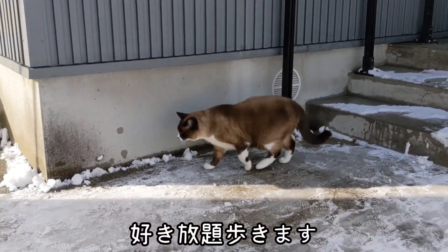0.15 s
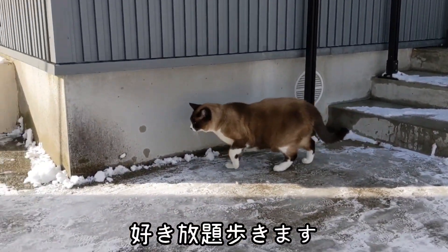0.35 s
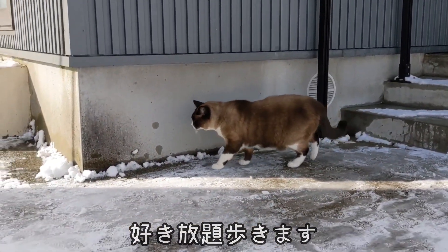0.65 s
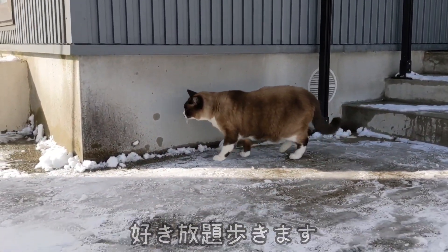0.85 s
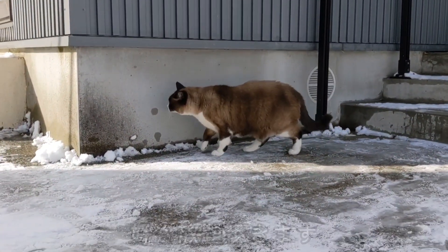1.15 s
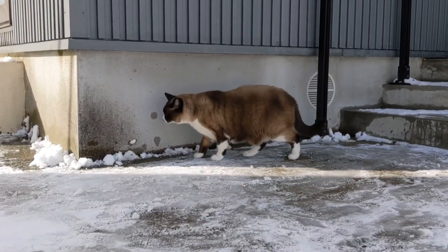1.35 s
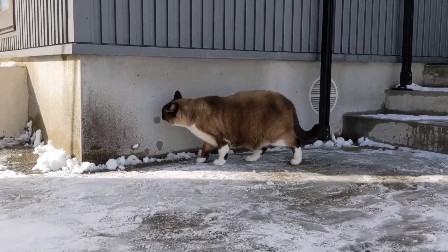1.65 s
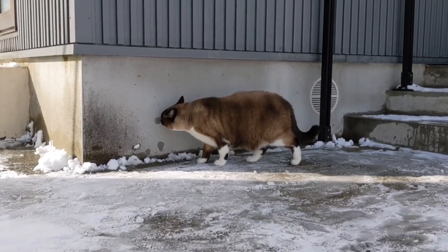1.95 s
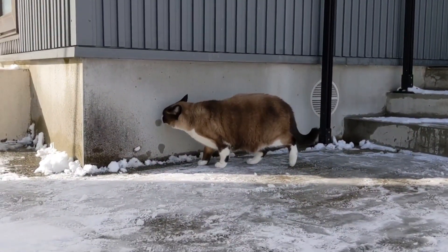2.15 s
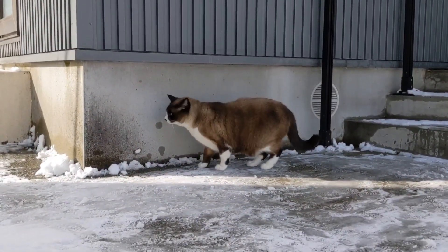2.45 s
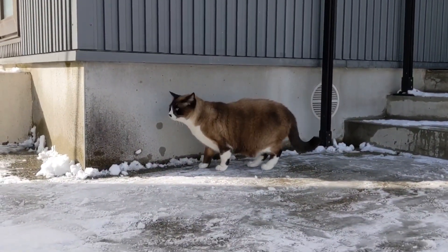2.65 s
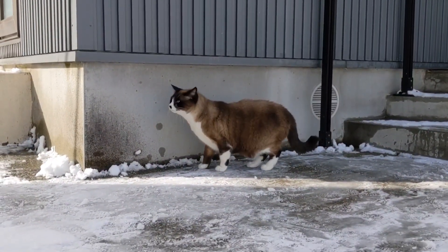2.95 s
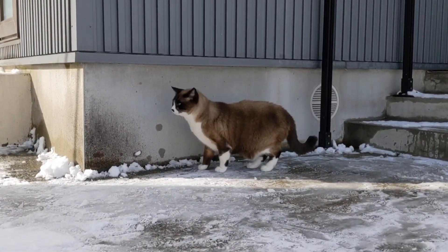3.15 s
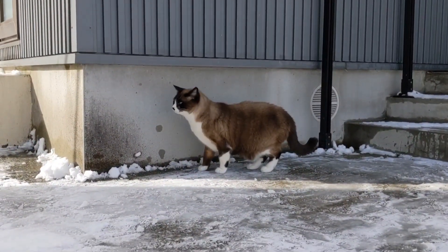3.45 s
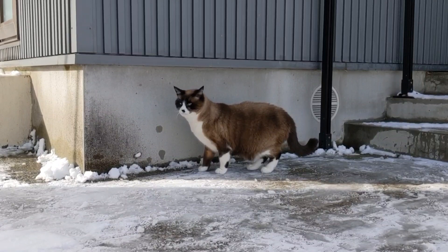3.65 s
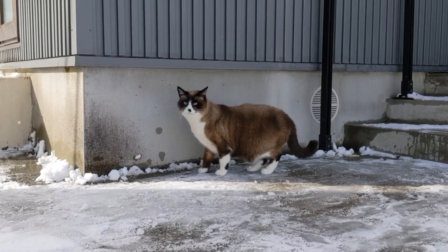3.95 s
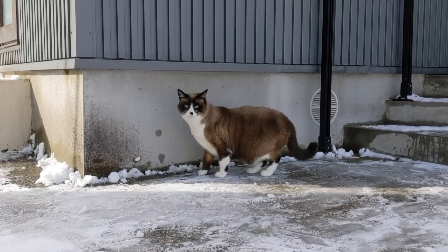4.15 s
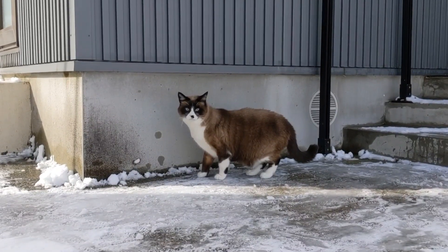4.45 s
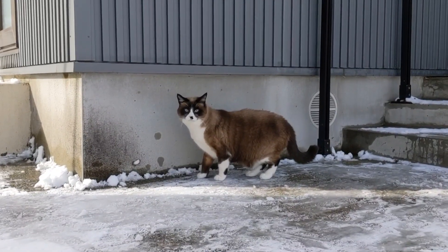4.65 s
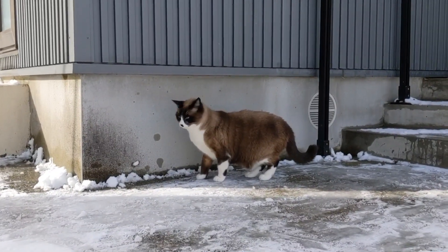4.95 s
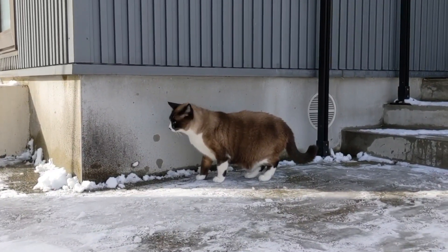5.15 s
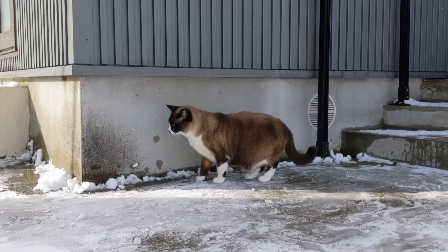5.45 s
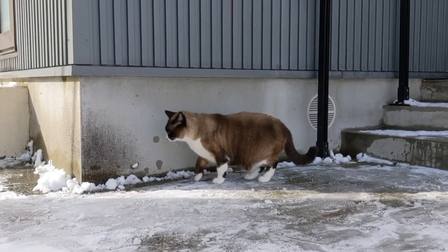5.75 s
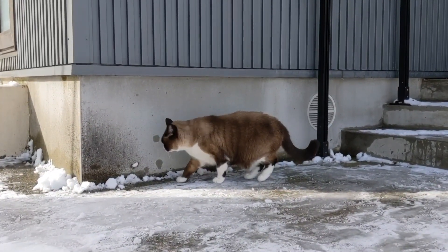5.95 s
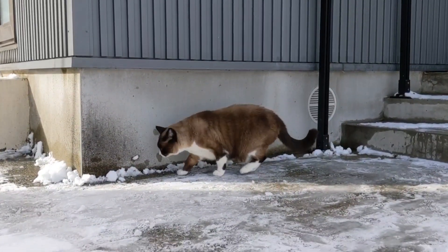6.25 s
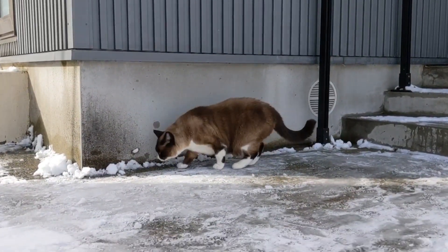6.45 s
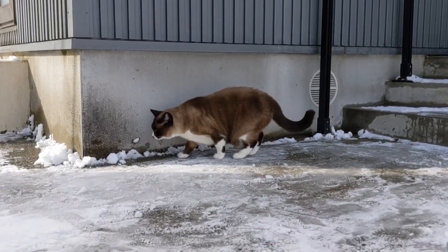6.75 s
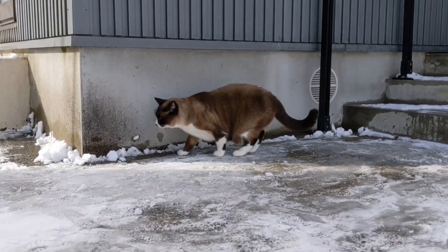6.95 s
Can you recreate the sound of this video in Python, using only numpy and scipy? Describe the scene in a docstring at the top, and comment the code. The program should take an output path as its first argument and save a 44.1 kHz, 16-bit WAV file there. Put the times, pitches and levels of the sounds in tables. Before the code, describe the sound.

A quiet yard beside a house, heard through an exposed stereo microphone with slight hiss. From 0.2 to 0.7 seconds, soft low wind puffs thump and rumble, with smaller ones near 1.3 and 1.8. A very faint dry rustle of snow, fizzy with a little scrape, swells around 0.3 and 1.6 seconds with tiny scuffs, then fades after 2. Small sharp drips tick on ice irregularly throughout, some bright, some duller, clearest around 1.9 and between 2.6 and 3.2, each echoing briefly off the wall. Distant neighbourhood noise stays low, with a barely audible wavering moan. Wind is mostly calm from 2 to 3.5 seconds, then builds at 4.1; heavy fluttering buffets cluster from 4.6 to 5.3. Uneven puffs continue, with one faint scuff near 5.65, and the strongest low burst arrives at 7 seconds as it ends.

```python
"""Puffs of wind buffet two microphone ports beside a house: low turbulence whose level and pitch ride the
airflow. Small sharp ticks, likely meltwater dripping on ice, are short coloured clicks that echo off the wall.
A soft rustle of snow, swells of filtered noise, fades after two seconds; a few quiet scuffs go with it, and
later a soft burst of noise trails a drip. Behind lies a quiet neighbourhood of coloured noise with a faint,
wavering, far-off moan."""
import sys
import numpy as np
from scipy import signal
from scipy.fft import rfft, irfft
from scipy.io import wavfile
from scipy.ndimage import uniform_filter1d, map_coordinates

SR = 44100
rng = np.random.default_rng(int(sys.argv[2]) if len(sys.argv) > 2 else 0)


def store_wav(level_fs):
    """Save 16-bit WAV to argv[1]."""
    pcm = np.round(np.clip(np.atleast_2d(level_fs), -1, 1) * 32767)
    wavfile.write(sys.argv[1], SR, pcm.T.astype(np.int16))


N = 312404
T = np.arange(N) / SR  # time [s]
HZ = np.fft.rfftfreq(N, 1 / SR)  # frequency of each spectral bin

# neighbourhood noise, its spectrum: (frequency [Hz], relative density [dB])
AIR_COLOUR = [(25, -20.5), (60, -1.5), (170, 5), (280, -4.5), (500, -10.5), (720, -10.5), (1000, -16),
              (2000, -19), (4000, -25.5), (8000, -31.5), (16000, -37)]
# neighbourhood noise, its middle level: (time [s], level [dB])
AIR_LEVEL = [(0, -52), (1.6, -53), (2.7, -54.5), (7.08, -56.5)]
# how alike the neighbourhood is left and right: (frequency [Hz], correlation [0 to 1])
AIR_LIKENESS = [(40, 1), (150, 1), (380, 0.89), (700, 0.58), (1300, 0.055), (16000, 0.013)]
# swells of a faint far moan: (time [s], level [dB], length [s], pitch [Hz])
MOAN_SWELLS = [(1.201, -61.5, 0.26, 348), (1.621, -57.5, 0.16, 372), (2.252, -64, .2, 337),
               (3.551, -58, .12, 385), (3.721, -63, 0.1197, 410), (3.9, -61.5, 0.12, 350)]
MOAN_HZ, MOAN_DB, WAVER_HZ = 361.3, -69, 32  # the moan between swells, and how fast it wavers

# swells of rustling snow: (time [s], fine fizz level [dB], length [s], coarser scrape level [dB])
RUSTLE_SWELLS = [(0.333, -59.5, 0.89, -62), (1.616, -65, 1.1, -67.5)]
# spectrum of the fine fizz: (frequency [Hz], relative density [dB])
FIZZ_COLOUR = [(1500, -23), (3000, -2), (5500, -1.5), (8000, -6.5), (11500, 2), (14000, -3), (16000, -12.5)]
# spectrum of the coarser scrape: (frequency [Hz], relative density [dB])
SCRAPE_COLOUR = [(300, -25), (700, -5), (1200, 2.5), (2000, 0.5), (3000, -10), (6000, -26)]
# soft bursts of noise, the first four scuffs on the snow, the last trailing a drip: # (time [s], peak level
# [dB], length [s], centre [Hz], band step [octaves])
SOFT_BURSTS = [(.62, -59, 0.06, 1980, 0.24), (0.835, -64, 0.15, 2010, 0.17), (1.076, -63, 0.1, 1688, 0.31),
               (1.611, -58.5, 0.13, 1938, 0.22), (5.655, -61, 0.051, 2206, 1.04)]
FLICKER_DB = 0.4  # rms of the slow flicker of the rustle

# drips: (time [s], level before colouring [dB], brightness [dB per octave], ring pitch [Hz],
#         left-right balance in the top treble [dB], yard echo before the wall and tail trims [dB])
DRIP_HITS = [(0.2190, -26.5, .7, 13500, 5, -16), (0.5348, -35, -2.5, 13000, 1, -1),
             (1.1110, -26.5, -4, 2880, -2, -19), (1.2037, -30.5, 1.5, 10500, 0, -13),
             (1.6450, -23, -2.5, 1920, 3, -14), (1.9130, -23, 7.5, 4084, 2.5, -13),
             (1.9474, -16.5, 9, 4310, 1, -12), (2.6043, -19.5, -0.5, 7290, 1, -15),
             (2.8643, -19.5, 2, 4085, 2, -12.5), (2.9340, -24, .8, 12840, 5, -9.5),
             (3.0094, -36, 6.5, 4085, 2, -6), (3.1786, -18.5, 1.5, 1900, -5, -11.5),
             (3.3427, -32.5, -0.1, 13240, 2, -8), (3.571, -27.5, 3.3, 13580, 5, -10),
             (3.9800, -22.5, 0, 14020, 17, -18), (4.0476, -19, -3, 10460, -2, -10.5),
             (4.2061, -22, -3, 4690, -1.5, -5.5), (4.286, -38, -1, 12950, 1, -13),
             (4.7141, -24, 1, 11980, 3, -10), (5.3420, -20, -2.6, 1700, -18.5, -12.5),
             (5.4354, -22, -2.7, 9800, 2, -11), (5.6222, -28.5, 3.5, 11100, 12, -18),
             (6.0270, -24, -.5, 1890, 1, -9), (6.3063, -35, -1, 12570, 4, -3),
             (6.6550, -24, 6.5, 3808, 6, -14)]
# colour shared by all drips: (frequency [Hz], gain [dB])
DRIP_COLOURING = [(100, -36), (600, -19.5), (1300, -3.5), (15000, -4), (17000, -8)]
# brightness tilts the spectrum between the outer two, about the middle one: (low, pivot, top [Hz])
BRIGHTNESS_HZ = [1800, 5400, 12500]
# echoes off ground, wall and steps: (delay [s], level against the wall echo [dB])
YARD_ECHOES = [(.0016, 2.5), (.0076, -2), (.0092, -11.5), (0.02, -5.5)]
RING_DB, RING_OCTAVES = 9.5, 0.61  # height and half-width of the broad ring of a drop
RIPPLE_DB = 1.2  # rms unevenness of a drop's spectrum
LUMPY_DB = 5.5  # rms unevenness of the echo tail
# farther drips fall at random; their echo comes before the wall and tail trims
FAINT_DRIPS_PER_S, FAINT_DRIP_DB, FAINT_ECHO_DB = 1.5, -44.5, -13.5

# stronger puffs: (time [s], peak level [dB], length [s], eddy pitch [Hz], left-right balance [dB])
STRONG_PUFFS = [(0.134, -39, 0.028, 124.8, -4), (0.23, -23.5, 0.048, 105, -4), (0.298, -21, .049, 112.1, 1),
                (0.365, -28.5, .057, 100.7, -4.5), (0.569, -27, 0.049, 100.6, -2.5),
                (0.69, -24.5, 0.047, 81.8, -2), (0.905, -38, 0.04, 144.6, -9.5),
                (0.998, -38, 0.035, 140.5, -10), (1.133, -39, .041, 110.4, 0),
                (1.319, -29, 0.022, 120.4, -5), (1.386, -30, 0.026, 115.2, -2),
                (1.758, -30.5, 0.018, 90.45, -3), (1.816, -37, 0.033, 84.8, -4.5),
                (1.911, -38, 0.038, 95.3, -4), (2.489, -40, .042, 99.8, -1), (2.944, -41, 0.037, 158.6, -6),
                (3.215, -39.5, 0.036, 141.3, -12), (3.564, -28.5, 0.065, 117.7, -5),
                (3.79, -38, 0.044, 114.5, -3), (4.096, -23, 0.054, 105.3, -7),
                (4.287, -28, 0.067, 111.5, -2), (4.393, -23.5, 0.048, 109, -5.5),
                (4.569, -23, 0.041, 130.4, 1), (4.633, -14.5, 0.036, 86.13, -4),
                (4.825, -16.5, .044, 100, -0.5), (4.864, -15, 0.034, 167.9, 1),
                (5.041, -16.5, 0.0401, 130.2, 0.5), (5.13, -27, 0.062, 84.9, -6),
                (5.29, -19, .024, 101, -1), (5.414, -23, 0.0758, 117.7, -4), (5.677, -23, 0.059, 130, -9),
                (5.773, -21, 0.088, 145, -7), (5.947, -26, 0.05, 119.9, -6), (6.093, -25.5, .04, 119.1, -4),
                (6.322, -19.5, .022, 111.9, -10), (6.556, -25, 0.037, 112.8, -1.5),
                (6.634, -21, 0.034, 98.5, -4), (6.718, -23.5, .039, 101.9, -4.5),
                (6.844, -24, 0.035, 145.3, -1.5), (6.987, -11.5, .037, 120, -4),
                (7.058, -13, .057, 123.9, -1)]
# light airflow between the puffs: (time [s], level before the breeze trim [dB])
BREEZE_LEVEL = [(0.0, -56), (0.12, -52.5), (0.43, -40), (1.08, -50.5), (2.84, -51), (3.63, -44),
                (3.94, -48), (4.75, -28.5), (5.32, -37.5), (5.5, -47), (5.92, -39), (6.13, -51.5),
                (6.56, -49.5), (6.68, -39.5), (7.08, -31.5)]
# spectrum of the low turbulence at its reference pitch: (frequency [Hz], relative density [dB])
BUFFET_COLOUR = [(15, -41), (28, -10), (55, 2.5), (110, 2.5), (165, -2), (240, -20.5), (380, -41.5),
                 (700, -80.5)]
BUFFET_HZ = 110  # reference pitch of the turbulence
# spectrum of the finer flutter: (frequency [Hz], relative density [dB])
FLUTTER_COLOUR = [(100, -21.5), (200, -1), (300, 10), (500, -11), (750, -23.5), (1100, -39), (2500, -77.5)]
# the deepest eddies favour the right port: (frequency [Hz], left-right balance [dB])
PORT_EXPOSURE = [(50, -8), (80, 1), (130, -4), (260, 0.5)]
GUSTY_DB = 1.8  # rms wander of the breeze
# a puff of HARD_DB at BUFFET_HZ flutters FLUTTER_DB against its own level; harder, faster puffs flutter more
HARD_DB, FLUTTER_DB, FLUTTER_DB_PER_DB, FLUTTER_DB_PER_OCTAVE = -13, -28, 0.33, 32.5
# small puffs come at random, from nothing to SMALL_PUFF_DB above the breeze
SMALL_PUFFS_PER_S, SMALL_PUFF_DB, SMALL_PUFF_S = 6, 8, 0.03042

# spectrum of the microphone hiss: (frequency [Hz], relative density [dB])
HISS_COLOUR = [(500, 5), (3000, 2.5), (8000, -17), (11000, 6), (13000, 3.5), (16000, 7)]
# resonances of the left port: (frequency [Hz], width [Hz], gain [dB])
LEFT_PORT_RINGS = [(13720, 260, 7), (14690, 220, 9)]
WIND_FILTER_HZ, EDGE_HZ = 45, 15950  # low and high limits of the microphone


def gain_of(db):
    """Decibels to an amplitude factor."""
    return 10 ** (np.asarray(db) / 20)


def evened(x):
    """Scales to rms 1."""
    return x / np.sqrt(np.mean(x ** 2) + 1e-20)


def read(points, hz):
    """Reads a spectrum on a log-frequency axis."""
    f, value = np.transpose(points)
    return np.interp(np.log(hz + 1), np.log(np.abs(f) + 1), value)


def follow(rows):
    """The columns of a curve at every sample."""
    s, *columns = np.transpose(rows)
    return [np.interp(T, s, column) for column in columns]


def spread(pan_db):
    """Left and right gains of constant total power; positive leans left."""
    pair = gain_of(np.array([[0.5], [-0.5]]) * pan_db)
    return pair / np.sqrt(np.mean(pair ** 2, axis=0))


def bump(s, length):
    """A smooth swell, about 4 dB down at the ends of its length."""
    return np.exp(-np.minimum(2 * ((T - s) / length) ** 2, 20))


def noise(colour, likeness=0.0):
    """Two channels of coloured noise, rms 1, with a given left-right likeness."""
    a, b = rfft(rng.standard_normal((2, N)))
    likeness = np.clip(likeness, -1, 1)
    right = likeness * a + np.sqrt(1 - likeness ** 2) * b
    return evened(irfft(np.array([a, right]) * gain_of(read(colour, HZ)), N))


def wander(rate_hz):
    """A random curve of rms 1, slower for a lower rate."""
    white = rfft(rng.standard_normal(N))
    return evened(irfft(white * np.exp(-(HZ / rate_hz) ** 2), N))


def steadied(x, size):
    """Evens out the slow swells of a noise, so that the airflow sets its level."""
    power = uniform_filter1d(uniform_filter1d(x ** 2, size), size)
    return x / np.sqrt(np.abs(power) + 1e-6)


def add(mix, s, sound):
    """Mixes a stereo sound in at time s."""
    part = mix[:, max(round(s * SR), 0):][:, :sound.shape[1]]
    part += sound[:, :part.shape[1]]


def far_moan():
    """Narrow noise: a gliding tone whose level and phase waver at random, swelling now and then."""
    power = np.full(N, gain_of(MOAN_DB) ** 2)  # it never quite stops
    pitch = power * MOAN_HZ
    for s, db, length, hz in MOAN_SWELLS:
        swell = (gain_of(db) * bump(s, length)) ** 2
        power = power + swell
        pitch = pitch + hz * swell
    tone = np.exp(2j * np.pi * np.cumsum(pitch / power) / SR)
    waver = wander(WAVER_HZ) + 1j * wander(WAVER_HZ)
    return np.sqrt(power) * evened((tone * waver).real)


def background(patch_db=1.5):
    """Far neighbourhood noise that swells a little, alike in both channels only in the bass, with the moan."""
    level_db = follow(AIR_LEVEL)[0] + patch_db * wander(4.7)
    air = noise(AIR_COLOUR, read(AIR_LIKENESS, HZ)) * gain_of(level_db)
    return air + far_moan()


def rustle(grain_db=2.5):
    """Dry snow shifts in two long swells of fizz and scrape, with soft scuffs and a later burst in narrower
    bands of noise."""
    fizz_power, scrape_power = np.zeros(N), np.zeros(N)
    for s, fizz_db, length, scrape_db in RUSTLE_SWELLS:
        swell = bump(s, length)
        fizz_power += (gain_of(fizz_db) * swell) ** 2
        scrape_power += (gain_of(scrape_db) * swell) ** 2
    out = np.sqrt(fizz_power) * noise(FIZZ_COLOUR) + np.sqrt(scrape_power) * noise(SCRAPE_COLOUR)
    steps = np.arange(-6, 7)
    for s, db, length, hz, octaves in SOFT_BURSTS:
        # falls 8 dB for each step away from the centre
        band = np.transpose([hz * 2 ** (steps * octaves), -8 * np.abs(steps)])
        out += gain_of(db) * bump(s, length) * noise(band)
    grains = gain_of(FLICKER_DB * wander(25) + grain_db * wander(2500))
    return grains * out


def causal(db):
    """The shortest click that has this spectrum (minimum phase)."""
    size = 2 * (db.shape[-1] - 1)
    log_gain = np.log(gain_of(np.maximum(db, -100)))
    circle = np.concatenate([log_gain, log_gain[:, -2:0:-1]], axis=1)
    spectrum = np.exp(np.conj(signal.hilbert(circle)))
    return irfft(spectrum[:, :db.shape[-1]], size)


def yard(echo_db, tail_db, t60=0.27, treble_t60=0.15, build_s=0.0051, smear_s=0.00092):
    """The path from one spot to the ports: direct sound, single echoes from the house, a short uneven tail."""
    t = np.arange(SR // 3) / SR
    # echoes come in clumps
    lumps = gain_of(LUMPY_DB * evened(uniform_filter1d(rng.standard_normal(len(t)), size=30)))
    scatter = lumps * rng.standard_normal((2, len(t))) * (1 - np.exp(-t / build_s))
    dull = uniform_filter1d(scatter, size=3)
    treble = scatter - dull  # air and snow swallow the treble first
    tail = dull * gain_of(-60 * t / t60) + treble * gain_of(-60 * t / treble_t60)
    response = gain_of(tail_db) * tail / np.linalg.norm(tail, axis=1, keepdims=True)
    response[:, 0] += 1  # direct sound
    for delay, db in YARD_ECHOES:
        siding = rng.standard_normal((2, 128)) * np.exp(-t[:128] / smear_s)  # ribbed surfaces smear each echo
        siding /= np.linalg.norm(siding, axis=1, keepdims=True)
        add(response, delay * rng.uniform(0.97, 1.05), gain_of(db + echo_db) * siding)
    return response


def faint_drips():
    """Rows like those of DRIP_HITS for the small far drops."""
    draws = rng.random((int(FAINT_DRIPS_PER_S * N / SR), 3))
    return [(at * N / SR, FAINT_DRIP_DB, 1, 5000 + 9000 * ring, 10 * (side - 0.5), FAINT_ECHO_DB)
            for at, ring, side in draws]


def drip_snap(db, tilt, ring_hz, pan_db):
    """A drop snaps on the ice: a very short click with one broad resonance."""
    hz = np.fft.rfftfreq(512, 1 / SR)
    low_hz, pivot_hz, top_hz = BRIGHTNESS_HZ
    octaves = np.log2(np.clip(hz, low_hz, top_hz) / pivot_hz)
    ring = RING_DB * np.exp(-(np.log2((hz + 1) / ring_hz) / RING_OCTAVES) ** 2)
    colour = db + tilt * octaves + ring + read(DRIP_COLOURING, hz)
    # every spot of ice has its own colour
    ripple = evened(uniform_filter1d(rng.standard_normal(len(hz)), size=10))
    # the body around the ports shades the sides differently along the treble
    shadow = spread(read([(1500, 3.5), (7500, -6.5), (10500, pan_db)], hz))
    return causal(colour + RIPPLE_DB * ripple + 20 * np.log10(shadow))


def drip_spatter(splash=0.48, splash_s=0.0012, lead_s=0.00019):
    """A first hit, slightly earlier at the left port, over about a millisecond of decaying spatter."""
    t = np.arange(256) / SR
    spatter = rng.standard_normal((2, len(t))) * np.exp(-t / splash_s)
    spatter *= splash / np.linalg.norm(spatter, axis=1, keepdims=True)
    right_delay = round(lead_s * rng.uniform(0.7, 1.5) * SR)
    spatter[0, 0] += 1
    spatter[1, min(right_delay, len(t) - 1)] += 1
    return spatter


def drips(wet_db=6.5, wall_db=3.0):
    """Each drop's snap is repeated by its spatter, then by the echoes and tail of the yard."""
    out = np.zeros((2, N))
    for s, db, tilt, ring_hz, pan_db, echo_db in [*DRIP_HITS, *faint_drips()]:
        snap = drip_snap(db, tilt, ring_hz, pan_db)
        tick = signal.fftconvolve(snap, drip_spatter(), axes=1)
        path = yard(echo_db + wall_db, echo_db + wet_db)
        add(out, s, signal.fftconvolve(tick, path, axes=1))
    return out


def small_puffs(airflow_db):
    """Rows like those of STRONG_PUFFS, at random moments, riding on the breeze."""
    rows = []
    for at, size, speed in rng.random((int(SMALL_PUFFS_PER_S * N / SR), 3)):
        db = airflow_db[int(at * N)] + SMALL_PUFF_DB * size
        hz = BUFFET_HZ * 2 ** ((speed - 0.5) / 2)
        rows.append((at * N / SR, db, SMALL_PUFF_S, hz, -4.5))
    return rows


def wind(breeze_db=-1.0, breeze_pan_db=-3.5, calm_hz=106.2, burst_db=3.5):
    """Eddies sweep over the ports: each puff sets their level and pitch, and harder, faster ones flutter more."""
    airflow_db = follow(BREEZE_LEVEL)[0] + breeze_db
    calm = gain_of(airflow_db + GUSTY_DB * wander(13.7)) ** 2
    # each port meets its own eddies
    turbulence = irfft(rfft(noise(BUFFET_COLOUR)) * spread(read(PORT_EXPOSURE, HZ)), N)
    flutter = steadied(noise(FLUTTER_COLOUR) * gain_of(burst_db * wander(170)), size=600)

    power = calm * spread(breeze_pan_db) ** 2
    weight, pitch = calm, calm * calm_hz  # the pitch is averaged by power
    flutter_power = np.zeros((2, N))
    for s, db, length, hz, pan_db in [*STRONG_PUFFS, *small_puffs(airflow_db)]:
        shape = bump(s, length) ** 2
        sides = spread(pan_db) ** 2
        push = gain_of(db) ** 2 * shape
        power = power + sides * push
        weight = weight + push
        pitch = pitch + hz * push
        flutter_db = db + FLUTTER_DB + FLUTTER_DB_PER_DB * (db - HARD_DB)
        flutter_db += FLUTTER_DB_PER_OCTAVE * np.log2(hz / BUFFET_HZ)
        flutter_power += sides * gain_of(flutter_db) ** 2 * shape ** 2  # squared: keeps to the crest of a puff

    travel = np.cumsum(pitch / weight / BUFFET_HZ)  # how far the turbulence has been carried [samples]
    eddies = np.array([map_coordinates(c, [travel], order=3, mode="wrap") for c in turbulence])
    return np.sqrt(power) * steadied(eddies, size=600) + np.sqrt(flutter_power) * flutter


def scene():
    """Wind on the microphone over the drips, the rustle and the background."""
    return background() + rustle() + drips() + wind()


def record(dry, hiss_db=-69.0, hiss_pan_db=-19.0, hiss_treble_pan_db=3.0):
    """Microphone hiss, the treble ring of the left port, the wind filter and the band limit."""
    hiss_sides = spread(read([(7000, hiss_pan_db), (11000, hiss_treble_pan_db)], HZ))
    spectrum = rfft(dry) + gain_of(hiss_db) * hiss_sides * rfft(noise(HISS_COLOUR))
    ring_db = sum(db / (1 + (2 * (HZ - hz) / width) ** 2) for hz, width, db in LEFT_PORT_RINGS)
    spectrum[0] *= gain_of(ring_db)
    wind_filter = signal.butter(5, WIND_FILTER_HZ, "high", fs=SR, output="sos")
    filtered = signal.sosfilt(wind_filter, irfft(spectrum, N))
    low_pass = signal.firwin(255, EDGE_HZ, window=("kaiser", 9), fs=SR)
    return signal.oaconvolve(filtered, low_pass[None], "same", axes=1)


dry = scene()
out = record(dry)
store_wav(out)
```